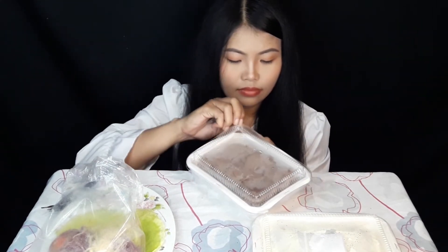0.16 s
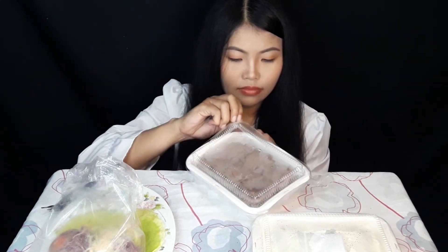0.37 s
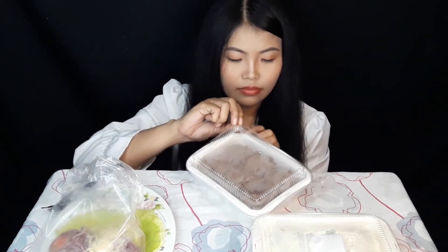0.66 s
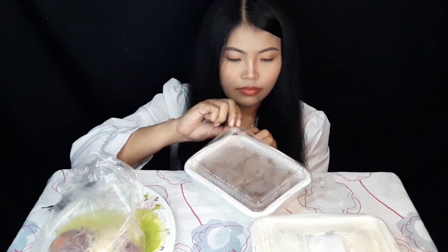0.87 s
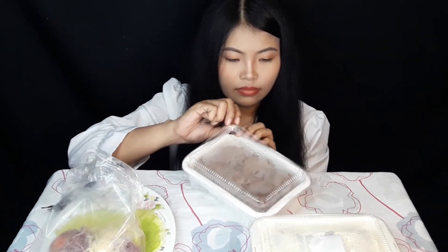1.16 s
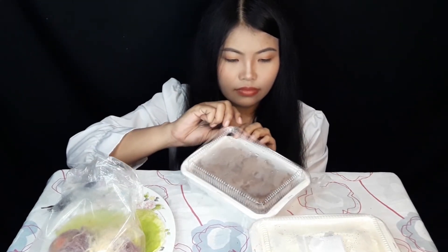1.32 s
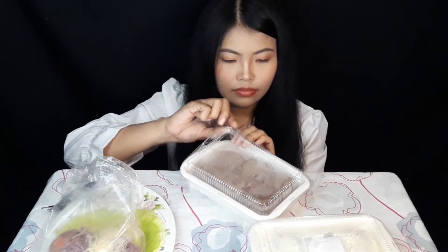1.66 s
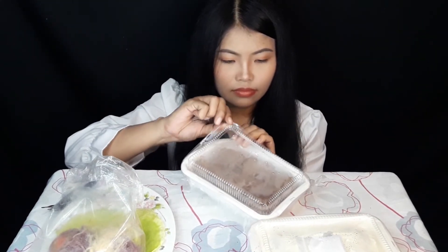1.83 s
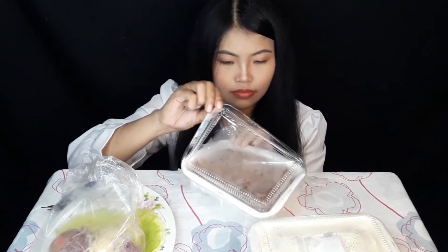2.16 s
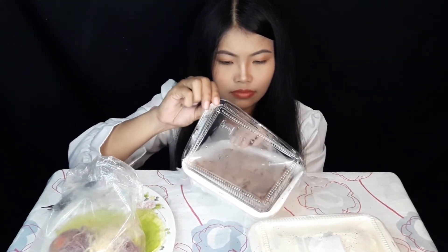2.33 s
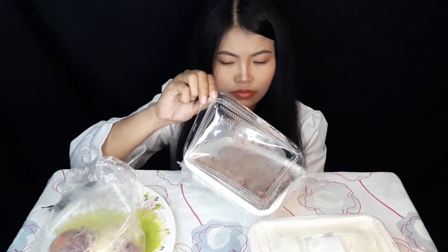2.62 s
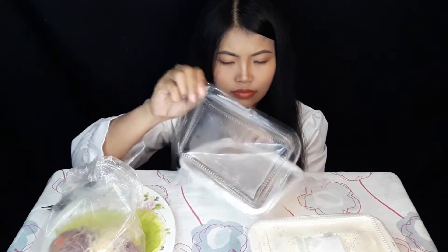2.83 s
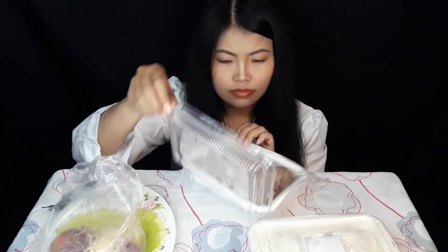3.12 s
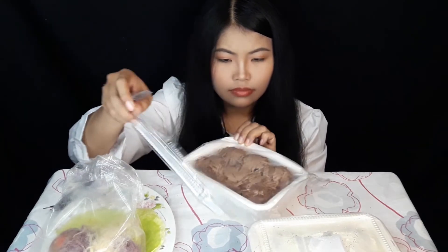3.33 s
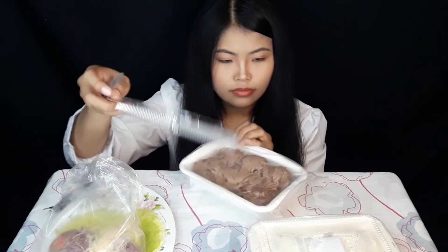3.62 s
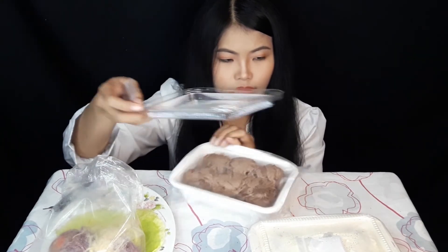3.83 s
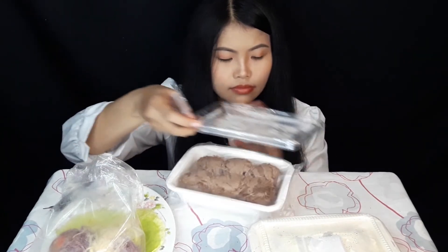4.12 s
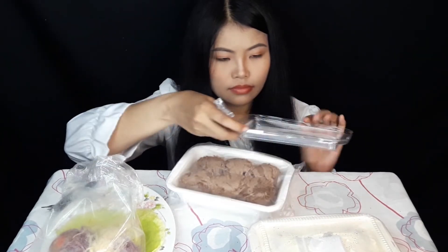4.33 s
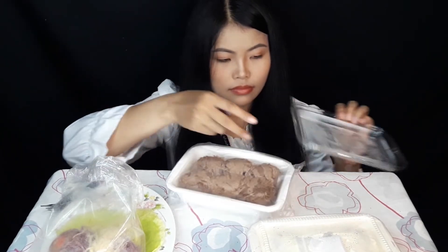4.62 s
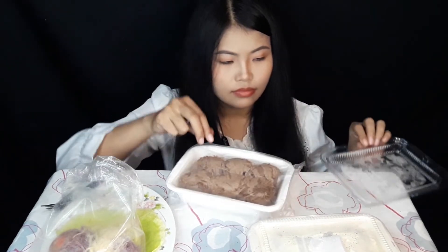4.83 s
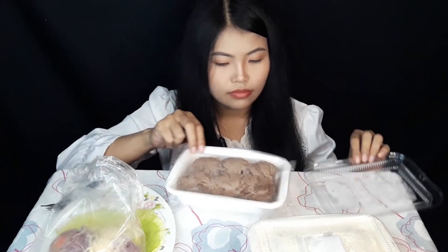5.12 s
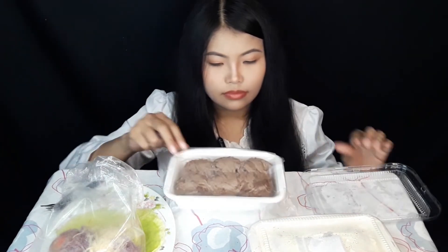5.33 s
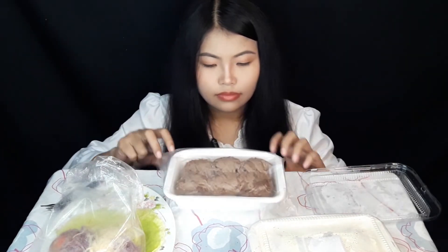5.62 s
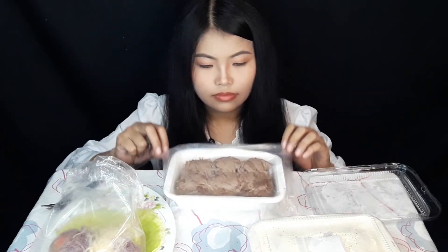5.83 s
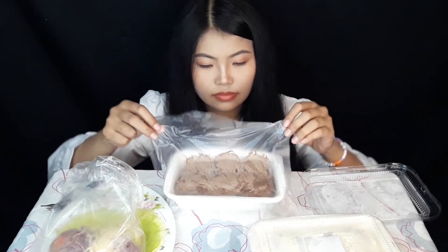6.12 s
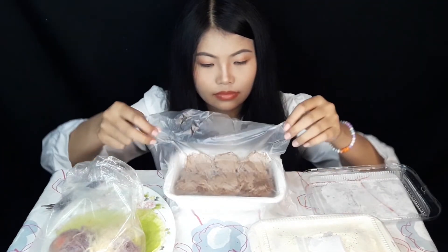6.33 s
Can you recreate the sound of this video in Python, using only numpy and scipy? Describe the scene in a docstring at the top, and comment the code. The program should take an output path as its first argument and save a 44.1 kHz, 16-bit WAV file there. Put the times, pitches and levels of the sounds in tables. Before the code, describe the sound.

Close, mono-sounding handling of thin stiff plastic in a small quiet room with a short reverberation and faint low background hush. Small ticks and rubs begin at once, with a loud hard snap at 0.3 s. From 0.4 to 1.3 s there are only light, dry crackles and a dull little bump near 1.2 s. Two fierce snaps come at about 1.5 s, then the loudest, clipping crack at 2.0 s, ringing hollowly around it. More irregular pops follow at 2.4 and 2.7 s, a heavy double one at 2.8 s, and a last sharp one at 3.1 s. From 3.4 to 4 s the freed lid rustles softly; near-quiet follows with faint knocks at 4.2 and 4.8 s. Brief crisp rubbing at 4.9-5.3 s as the lid is laid down, a short lull, then bright, dense film crinkling and ticking from 5.65 s, thinning toward 6.4 s.

```python
"""Prying open a plastic food tray

Fingers pry a thin clear plastic lid off a food tray, close to a microphone in a small quiet room.
The rim lets go in loud snaps (buckling panels) that ring the standing waves of lid and room and overload
the microphone. Between them the plastic rubs (dense tiny slips) and ticks (single creases that flip);
soft bumps knock. The lid is laid on the table, then the thin film over the food crinkles as it is picked up.
"""
import sys
import numpy as np
from scipy import signal
from scipy.fft import rfft, irfft
from scipy.io import wavfile

SR = 44100
rng = np.random.default_rng(int(sys.argv[2]) if len(sys.argv) > 2 else 0)


def wrap_up_sound(samples):
    """Save the sound to the file named by the first command line argument, as 16-bit audio."""
    columns = np.atleast_2d(samples).T
    # keep every value between -1 and 1, then stretch to whole-number steps
    tamed = np.clip(columns, -1, 1)
    steps = np.round(tamed * 32767).astype(np.int16)
    wavfile.write(sys.argv[1], SR, steps)


N = 285327
TIME = np.arange(N) / SR
GRID_SIZE = 4096   # samples in a short response
GRID_HZ = np.maximum(np.fft.rfftfreq(GRID_SIZE, 1 / SR), 1)

# spectral envelope of the snapping lid: (frequency [Hz], relative level [dB per Hz])
SNAP_COLOUR = [(30, -41), (60, -32), (110, -14.5), (250, -14.5), (400, -7), (550, -10.5), (850, 0),
               (1100, -6), (1500, -5.5), (2500, -8), (4500, -18), (7000, -18.5), (8200, -26), (15500, -30)]
# spectral envelope of creasing and rubbing plastic: (frequency [Hz], relative level [dB per Hz])
CRINKLE_COLOUR = [(50, -14.5), (200, -2.5), (330, -3.5), (480, -0.5), (700, 0.5), (950, -4), (1800, -1.5),
                  (2700, -1.5), (4000, -2), (5000, -6.5), (7100, 0.5), (8200, -12.5), (11500, -10),
                  (15500, -13)]
# reverberation time of the room: (frequency [Hz], decay by 60 dB [s])
ROOM_T60 = [(150, 0.28), (400, 0.28), (1200, 0.31), (2800, 0.3), (7200, 0.33), (14000, 0.34)]


def snaps(level_db=18.0, panel_db=6.0, room_db=-0.5, ring_db=-3.5):
    """Snap-through buckling: a panel jumps with a crack at its own pitch, then lid and room ring."""
    # the rim lets go: (time [s], relative strength [dB], pitch of the flexing panel [Hz],
    # bass tilt [dB], treble tilt [dB], relative ring of the standing waves [dB])
    snap_events = [(.096, -15.5, 1100, -7, -2.5, -4), (.2942, -2, 1080, -8, 0, -28),
                   (1.414, -19, 2540, 7, -2, 0), (1.4806, 1, 1170, 3, -3, -1),
                   (1.5124, -2.5, 1345, 2, 3, -5.5), (1.92, -7.5, 1030, 8.5, -2, -4),
                   (1.9214, -10.5, 2800, -4, 2, -15), (1.9825, 4, 1270, 9.5, 2.5, 2.5),
                   (1.9928, 9, 1640, -8, -6, 0), (2.4257, -3.5, 1450, 4.5, 3.5, -10.5),
                   (2.602, -16, 1620, 10, 8.5, -15), (2.71, -2.5, 710, 11, 3, -23.5),
                   (2.7145, -13, 2380, 4.5, 11, -16), (2.7221, -8.5, 440, 12, -7, -14.5),
                   (2.8314, 5, 750, 4.5, 0.5, -.5), (2.8431, 1, 410, 3.5, 5, -17.5),
                   (3.1334, 2, 1380, -1, 3.5, -18.5)]
    out = np.zeros(N)
    bass = 1 / (1 + (GRID_HZ / 450) ** 3)
    treble = 1 / (1 + (3200 / GRID_HZ) ** 3)
    presence = 5 * hump(7000, octaves=0.072)   # the microphone's presence peak
    for s, db, pitch_hz, bass_db, treble_db, wave_db in snap_events:
        colour_db = at_hz(SNAP_COLOUR, GRID_HZ) + presence + panel_db * hump(pitch_hz, octaves=0.22)
        body = response(colour_db + bass_db * bass + treble_db * treble)
        flip = through(buckle(decay_s=0.0018, crackle_db=0.0), body)
        crack = unit_energy(disperse(flip, lag_s=0.0007))
        echo = unit_energy(through(room_tail(), body))   # each snap gets its own random diffuse tail
        ringing = from_db(room_db) * echo + from_db(ring_db + wave_db) * standing_waves()
        add(out, s, from_db(db) * crack)
        add(out, s, from_db(db) * ringing)
    return from_db(level_db) * out


def buckle(decay_s, crackle_db, rise_s=0.0006):
    """Snap-through is impulsive: one sharp flip of the sheet, with a brief shiver of finer ones after it."""
    t = TIME[:GRID_SIZE]
    noise = cut(rng.standard_normal(GRID_SIZE), 910, "high")
    shiver = noise * np.exp(-t / decay_s) * (1 - np.exp(-t / rise_s))
    impulse = t == 0
    return from_db(crackle_db) * unit_energy(shiver) + impulse


def disperse(x, lag_s):
    """Bending-wave dispersion in a thin sheet: low notes travel slower (lag given at 1 kHz)."""
    phase = 4 * np.pi * lag_s * np.sqrt(1000 * GRID_HZ)
    return irfft(rfft(x) * np.exp(-1j * phase))


def standing_waves(scatter_db=-2.5):
    """Modal superposition: every mode starts at a random strength and dies with the room; energy 1."""
    # standing waves of lid and room: (frequency [Hz], relative level [dB])
    wave_modes = [(403, -14.5), (578, -12.5), (691, -1.5), (773, 1.5), (846, -15.5), (936, 5.5),
                  (990, -13.5), (1049, -13), (1242, -3.5), (1341, -11.5), (1398, -6), (1470, -8.5),
                  (1567, -4.5), (1683, -5.5), (1812, -0.5), (1914, -8.5), (2218, -11.5), (2516, -8)]
    t = TIME[:SR // 2]
    hz, level_db = np.transpose(wave_modes)[:, :, None]
    sign = rng.choice([-1, 1], hz.shape)
    strength = sign * from_db(level_db + scatter_db * rng.standard_normal(hz.shape))
    fade = np.exp(-np.log(1000) * t / at_hz(ROOM_T60, hz))
    return unit_energy(np.sum(strength * np.sin(2 * np.pi * hz * t) * fade, axis=0))


def ticks(tail, rub_gain, level_db=1.0, crease_db=5.0, room_db=-1.5, treble_db=1.0):
    """Bistability of creased sheet: single creases flip, each favouring a pitch of its own."""
    # creases that flip loudly enough to stand out: (time [s], relative peak [dB], pitch [Hz])
    tick_events = [(.066, -13.5, 3120), (.0754, -18, 3800), (.186, -25, 3440), (.205, -12.5, 3400),
                   (.677, -19, 6770), (.7786, -18, 6600), (.884, -23.5, 2420), (.9885, -23.5, 2330),
                   (1.1438, -17.5, 2020), (1.4347, -16.5, 3600), (1.5544, -10.5, 5100),
                   (1.6402, -22.5, 7250), (1.6826, -19.5, 6730), (1.8314, -17, 1540), (1.8911, -27, 2660),
                   (1.9315, -9.5, 3000), (1.956, -6.5, 2500), (2.2317, -22.5, 1600), (2.2734, -20.5, 2700),
                   (2.385, -21, 6170), (2.4002, -15.5, 1724), (3.0794, -11.5, 3520), (3.37, -26.5, 2450),
                   (3.4307, -25.5, 6900), (3.4736, -26, 6880), (3.518, -19, 6400), (3.9272, -17.5, 6360),
                   (4.0755, -32.5, 2620), (4.3622, -29.5, 2670), (4.5236, -37.5, 1760),
                   (4.669, -44.5, 1910), (5.3793, -29, 4660), (5.5315, -33, 3750), (5.61, -33.5, 1850),
                   (5.6543, -24.5, 6920), (5.7363, -16, 2300), (5.7882, -11, 3330), (5.842, -8.5, 7300),
                   (5.9855, -12, 7150), (6.09, -13.5, 7440), (6.1407, -13.5, 7010), (6.1569, -16.5, 2420),
                   (6.1959, -15.5, 3600), (6.2162, -18.5, 6750), (6.2567, -16.5, 1700),
                   (6.3482, -20.5, 1640), (6.3865, -22, 7000), (6.4274, -21.5, 2300), (6.4438, -15, 3830),
                   (6.4495, -15, 6500)]
    out = np.zeros(N)
    for s, db, pitch_hz in np.vstack([tick_events, stray_creases(rub_gain)]):
        colour_db = at_hz(CRINKLE_COLOUR, GRID_HZ) + treble_db * hump(12000, octaves=0.5)
        body = response(colour_db + crease_db * hump(pitch_hz, octaves=0.24))
        tick = unit_energy(through(buckle(decay_s=0.0013, crackle_db=4.0), body))
        size = from_db(db) / np.abs(tick).max()
        add(out, s, size * tick)
        add(out, s, size * from_db(room_db) * through(tail, body))
    return from_db(level_db) * out


def stray_creases(rub_gain, per_s=26, over_rub_db=12.5, spread_db=-0.5, low_hz=1800, high_hz=7500):
    """Poisson process: lesser flips stand above the rub and follow its level; rows (s, relative dB, Hz)."""
    wait, size, pitch = rng.random((GRID_SIZE, 3)).T
    s = np.cumsum(-np.log(1 - wait)) / per_s   # exponential waiting times
    rub_db = 20 * np.log10(np.interp(s, TIME, rub_gain))
    db = rub_db + over_rub_db + spread_db * (2 * size - 1)
    hz = low_hz * (high_hz / low_hz) ** pitch
    return np.column_stack([s, db, hz])[s < TIME[-1]]


def crinkle(tail, crisp_gain, dull_gain, crisp_db=-1.5, dull_db=-2.5, room_db=-10.0, split_hz=2100):
    """Stick-slip friction: sliding plastic crackles; the same slips shake the wider sheet with a duller rub."""
    slips = grains(per_s=1100, spread_db=4.0, clump_db=1.75, hiss_db=-1.0, crease_db=12.5)
    crisp = rms_one(cut(slips, split_hz, "high", order=3)) * from_db(crisp_db) * crisp_gain
    dull = rms_one(cut(slips, split_hz, "low", order=3)) * from_db(dull_db) * dull_gain
    return crisp + dull + from_db(room_db) * through(crisp + dull, tail)


def grains(per_s, spread_db, clump_db, hiss_db, crease_db, count=10):
    """Crackling noise: tiny uneven slips in clumps over friction; creases of different pitch take turns."""
    sizes = from_db(spread_db * np.minimum(rng.exponential(1, N), 3.2)) * rng.choice([-1, 1], N)
    clicks = sizes * (rng.random(N) < per_s / SR)
    dealt = rng.integers(0, count, N)   # which crease each click excites
    colour = at_hz(CRINKLE_COLOUR, GRID_HZ)
    slips = np.zeros(N)
    for k, hz in enumerate(np.geomspace(900, 12000, count)):
        turn = from_db(3.5 * wobble(step_s=0.04))
        crease = disperse(response(colour + crease_db * hump(hz, octaves=0.36)), lag_s=0.000798)
        slips += through(clicks * turn * (dealt == k), crease)
    friction = through(rng.standard_normal(N), response(colour))
    clumps = from_db(clump_db * wobble(step_s=0.0088))
    return clumps * (rms_one(slips) + from_db(hiss_db) * friction)


def rub_levels(attack_s=0.012, release_db_per_s=258, rest_db=-68):
    """Friction noise follows the stroke: quick attack, steady swell or fade, release; crisp and dull gains."""
    # plastic slides under the fingers: (start [s], length [s], relative level [dB],
    # swell over the stroke [dB], dull rub against crisp crackle before their own levels [dB])
    rub_strokes = [(0, 0.12, -35, -8.5, 1), (0.192, 0.077, -37, -4.5, -3), (0.435, 0.18, -43, -21, -2.5),
                   (0.6, 0.097, -37.5, 9, -4), (0.721, 0.091, -42.5, 5, 1), (0.865, 0.15, -45, -3.5, 1),
                   (0.988, 0.23, -40.5, -4, -1.5), (1.28, 0.15, -51, -10.5, 4.5),
                   (1.425, 0.076, -37, -5, 3.5), (1.676, .11, -42.5, 0.5, -3), (1.845, .07, -43.5, 3, 2),
                   (2.272, 0.097, -42, -12, -2.5), (2.665, 0.051, -41.5, 18, -6),
                   (2.998, 0.097, -38, -2, -0.5), (3.4, 0.055, -48, 12, -11), (3.517, .1, -40.5, 1, -6),
                   (3.626, 0.32, -36, 2.5, -7), (4.481, .05, -57, -1.5, 3), (4.914, 0.17, -34.5, 6.5, -6.5),
                   (5.08, 0.18, -39, -2, -4), (5.25, 0.05, -38.5, 3, -3), (5.664, 0.19, -33, -3.5, -4),
                   (5.863, 0.21, -32, 5.5, -7), (6.113, .17, -41, -4, 0), (6.376, .08, -52, -2, 0)]
    crisp = dull = from_db(rest_db)   # the faint stir of plastic that is only held
    for start, length, db, swell_db, dull_db in rub_strokes:
        t = TIME - start
        attack = np.clip(t / attack_s, 0, 1)
        slope_db = db + swell_db * (np.clip(t / length, 0, 1) - 0.5)
        release_db = release_db_per_s * np.clip(t - length, 0, 1)
        gain = attack * from_db(slope_db - release_db)
        crisp = np.maximum(crisp, gain)
        dull = np.maximum(dull, gain * from_db(dull_db))
    return crisp, dull


def wobble(step_s):
    """Slow random modulation: chance values a step apart, joined by straight lines."""
    values = rng.standard_normal(GRID_SIZE)
    return np.interp(TIME / step_s, np.arange(GRID_SIZE), values)


def bumps(tail, level_db=20.0, direct_db=-4.5):
    """Impulse response of a soft contact: a hollow knock, heard mostly through the room."""
    # soft bumps of hand, lid and tray: (time [s], relative strength [dB], pitch [Hz], hollowness [dB])
    bump_events = [(.005, -33, 172, 42), (1.195, -36, 186, 43), (4.2265, -37, 897, 15.5),
                   (4.527, -46, 1107, 18), (4.792, -35.5, 446, 26.5), (4.835, -35, 168.5, 42),
                   (5.801, -36, 383, 23)]
    out = np.zeros(N)
    for s, db, pitch_hz, hollow_db in bump_events:
        colour_db = hollow_db * hump(pitch_hz, octaves=1.0) + at_hz(SNAP_COLOUR, GRID_HZ) / 2
        add(out, s, from_db(db) * response(colour_db))
    return from_db(level_db) * (from_db(direct_db) * out + through(out, tail))


def room_tail(build_s=0.0032):
    """Diffuse reverberation: dense reflections build up quickly and die exponentially band by band; energy 1."""
    t = TIME[:SR // 2]
    white = rfft(rng.standard_normal(len(t)))
    hz = np.fft.rfftfreq(len(t), 1 / SR)
    build = 1 - np.exp(-(t / build_s) ** 2)
    edges = np.geomspace(40, SR / 2, 28)
    tail = 0
    for low, high in zip(edges, edges[1:]):
        fade = from_db(-60 * t / at_hz(ROOM_T60, np.sqrt(low * high)))
        band = irfft(white * (hz >= low) * (hz < high), len(t)) * fade * build
        tail = tail + np.sqrt(high - low) * unit_energy(band)   # equal energy per Hz
    return unit_energy(tail)


def hush(level_db=-54.0):
    """Stationary noise shaped by a spectrum: the quiet room and the microphone's own hiss."""
    # spectral envelope of the background: (frequency [Hz], relative level [dB per Hz])
    hush_colour = [(30, -24), (55, -12.5), (110, -6), (180, -7.5), (400, -13), (800, -19), (3200, -26),
                   (5600, -33), (7000, -40.5), (8200, -42.5), (12000, -32.5), (15500, -31.5)]
    noise = through(rng.standard_normal(N), response(at_hz(hush_colour, GRID_HZ)))
    return from_db(level_db) * rms_one(noise)


def from_db(db):
    """Logarithmic level: decibels to amplitude gain."""
    return 10 ** (np.asarray(db) / 20)


def unit_energy(x):
    """Energy normalisation: scale a short sound to a sum of squares of 1."""
    return x / np.sqrt(np.sum(x ** 2) + 1e-20)


def rms_one(x):
    """Power normalisation: scale a long sound to rms 1."""
    return unit_energy(x) * np.sqrt(len(x))


def at_hz(points, hz):
    """Logarithmic frequency scale: interpolate a table along it."""
    f, value = np.transpose(points)
    return np.interp(np.log(hz), np.log(f), value)


def hump(centre_hz, octaves):
    """Broad resonance: a Gaussian bell of height 1 over log frequency."""
    return np.exp(-0.5 * (np.log2(GRID_HZ / centre_hz) / octaves) ** 2)


def response(level_db):
    """Minimum phase: the causal click response of a body with this colour, by folded cepstrum; energy 1."""
    cepstrum = irfft(np.log(from_db(level_db)))
    cepstrum[1:GRID_SIZE // 2] *= 2
    cepstrum[GRID_SIZE // 2 + 1:] = 0
    return unit_energy(irfft(np.exp(rfft(cepstrum))))


def through(x, kernel):
    """Linear superposition: convolve with an impulse response and keep the length."""
    return signal.fftconvolve(x, kernel)[:len(x)]


def cut(x, hz, kind, order=2):
    """Maximally flat (Butterworth) filtering."""
    return signal.sosfilt(signal.butter(order, hz, kind, fs=SR, output="sos"), x)


def add(track, s, sound):
    """Superposition: mix a sound into a track at a time in seconds."""
    start = max(round(s * SR), 0)
    track[start:start + len(sound)] += sound[:N - start]


def scene():
    """Superposition of all sources; rubs, ticks and bumps share one reverberant tail."""
    tail = room_tail()
    crisp_gain, dull_gain = rub_levels()
    handling = snaps() + ticks(tail, crisp_gain) + crinkle(tail, crisp_gain, dull_gain) + bumps(tail)
    return (handling + hush())[None]


def record(dry):
    """Overload distortion: deep bass is shed, the loudest snaps clip at full scale, then the top is cut."""
    clipped = np.clip(cut(dry, 45, "high"), -1, 1)
    top_cut = signal.ellip(12, 0.1, 100, 16000, fs=SR, output="sos")   # low-pass at 16 kHz
    return signal.sosfilt(top_cut, clipped)


dry = scene()
out = record(dry)
wrap_up_sound(out)
```